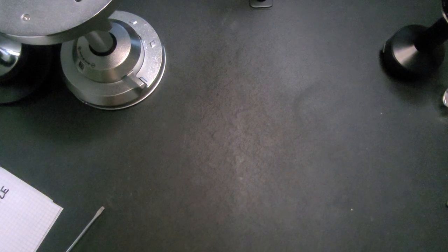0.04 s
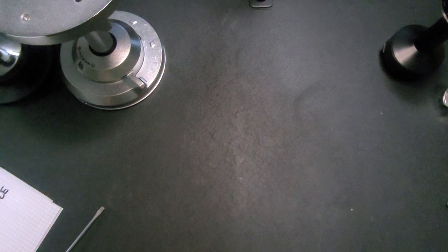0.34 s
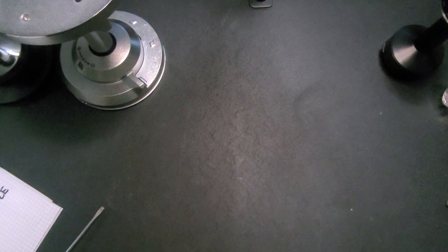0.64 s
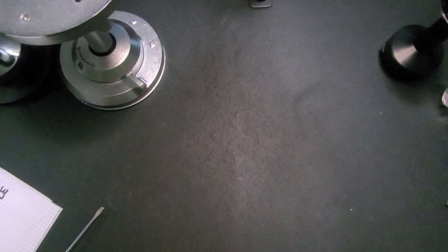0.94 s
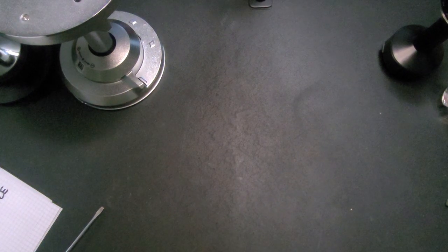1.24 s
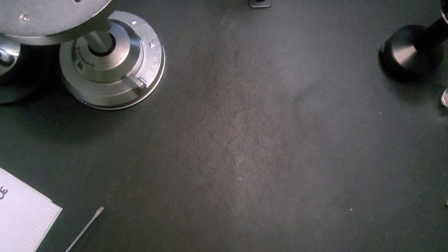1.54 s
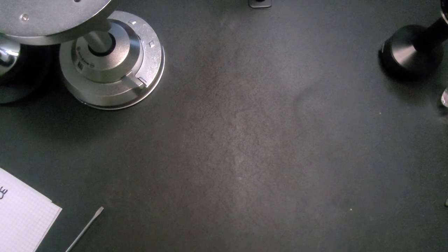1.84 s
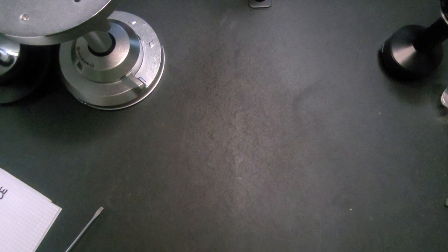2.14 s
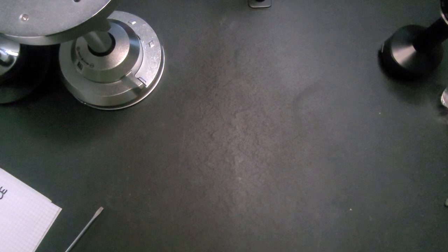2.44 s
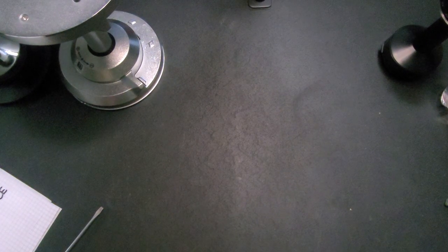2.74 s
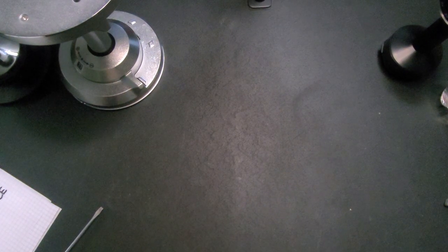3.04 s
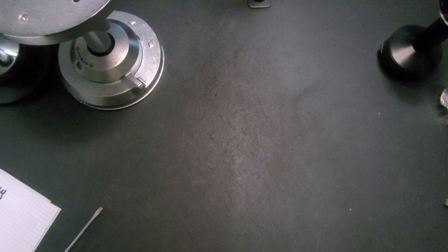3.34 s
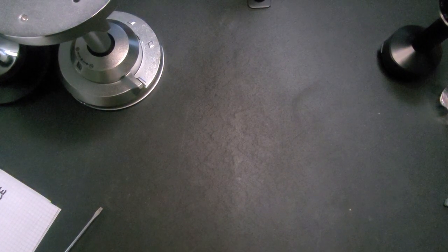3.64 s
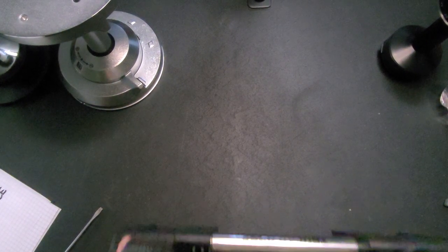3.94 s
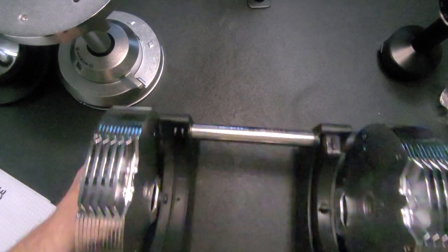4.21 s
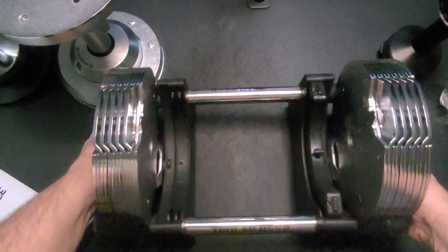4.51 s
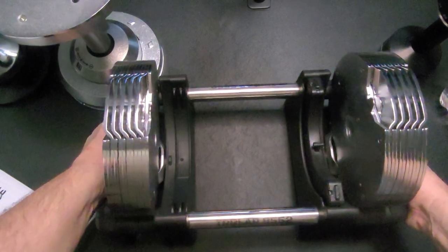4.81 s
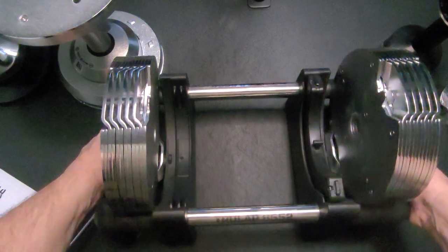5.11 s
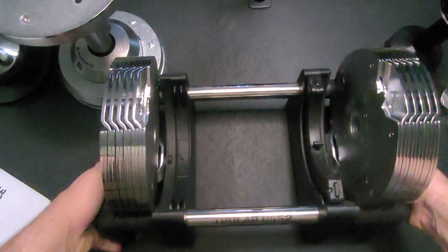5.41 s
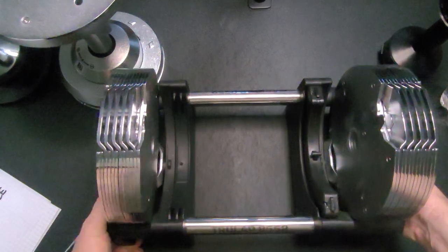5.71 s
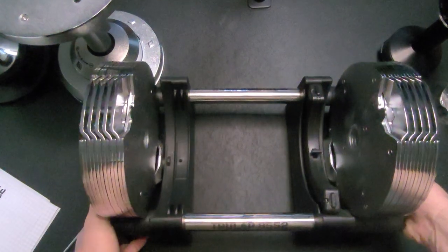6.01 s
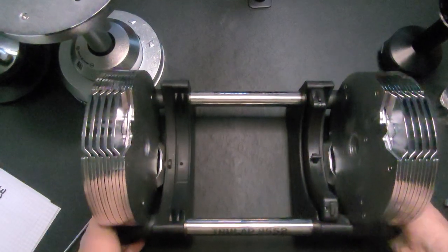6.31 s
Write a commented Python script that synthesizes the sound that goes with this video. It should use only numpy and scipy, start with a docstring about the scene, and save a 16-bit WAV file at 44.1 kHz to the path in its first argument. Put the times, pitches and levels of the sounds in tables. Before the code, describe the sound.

In a small room, a few scuffs and hollow knocks sound as an adjustable dumbbell is fetched. It lands on a bench with a low boom that shakes the microphones standing there. Its stacked steel plates clack and ring and its plastic base knocks, with the sharpest clack coming a second later. Lighter knocks and a thin, faint squeak follow as it is eased into place. Hands rub softly over faint steady noise.

```python
"""A small room with a bench. An adjustable dumbbell is fetched with a few scuffs, carried over and
lowered onto the bench in its base. The stacked steel plates clack and ring; the hollow plastic base
knocks and squeaks faintly. The bench booms under the weight and shakes the microphones standing on it.
Hands rub, and a soft hiss swells and sinks over steady noise."""
import sys
import numpy as np
from scipy import signal
from scipy.fft import rfft, irfft, next_fast_len
from scipy.io import wavfile
from scipy.ndimage import uniform_filter1d, map_coordinates

SR = 44100
rng = np.random.default_rng(int(sys.argv[2]) if len(sys.argv) > 2 else 0)


def unload_wav(signal):
    """Save mono or channel-first audio to the path in sys.argv[1] as 16-bit WAV at rate SR, clipped to [-1, 1]."""
    wavfile.write(
        sys.argv[1],
        SR,
        np.round(np.clip(np.atleast_2d(signal).T, -1, 1) * 32767).astype(np.int16),
    )


N = 289111
TOP_HZ = 16000


def amp(db):
    """dB to gain."""
    return 10 ** (np.asarray(db) / 20)


def unit(x):
    """x at rms 1."""
    return x / np.sqrt(np.mean(x ** 2) + 1e-20)


def along(points, hz):
    """Interpolate (f/Hz, value) points on a log axis."""
    f, v = np.transpose(points)
    return np.interp(np.log(hz + 1), np.log(f + 1), v)


def curves(rows):
    """Per-sample curve of each column after t/s."""
    times, *columns = np.transpose(rows)
    return [np.interp(np.arange(N) / SR, times, column) for column in columns]


def filtered(x, response):
    """Apply a complex frequency response."""
    n = x.shape[-1]
    m = next_fast_len(n + SR // 2)
    return irfft(rfft(x, m) * response(np.fft.rfftfreq(m, 1 / SR)), m)[..., :n]


def resonances(modes, hz):
    """Causal response of modes: f/Hz, width/Hz, gain/dB."""
    return sum(amp(db) * 1j * hz * w / (f * f - hz * hz + 1j * hz * w) for f, w, db in modes)


def noise_pair(size, corr):
    """Stereo white noise with L-R correlation corr."""
    mid, side = rng.standard_normal((2, size))
    angle = np.arccos(np.clip(corr, -1, 1)) / 2
    return np.cos(angle) * mid + np.sin(angle) * np.array([side, -side])


def coloured_noise(spectrum, corr):
    """Shaped stereo noise, rms 1."""
    return unit(filtered(noise_pair(N, corr), lambda hz: amp(along(spectrum, hz))))


def jitter(size, window):
    """Moving-average noise, rms 1."""
    return unit(uniform_filter1d(rng.standard_normal(size), size=window))


def panned(pan_db):
    """L and R gains, mean 1."""
    gains = amp(np.array([[pan_db], [-pan_db]]) / 2)
    return gains / gains.mean()


def add(track, start_s, sound):
    """Mix a sound in at start_s."""
    part = track[:, max(round(start_s * SR), 0):][:, :sound.shape[-1]]
    part += sound[:, :part.shape[1]]


def envelope(t, rise_s, t60_s):
    """Exponential rise and decay, peak 1."""
    shape = (1 - np.exp(-t / max(rise_s, 1e-4))) * amp(-60 * t / max(t60_s, 0.004))
    return shape / shape.max()


# Body, middle, treble bands: f_low/Hz, f_high/Hz
CONTACT_BANDS = [(280, 950), (1000, 3600), (3800, 14500)]
# L-R correlation per band
CONTACT_CORR = [0.75, 0.26, 0.05]


def contact(db, bright_db, t60_s, body_db, rise_s, grain_db):
    """Rough contact: a dying shower of tiny impacts, tilted about the middle band by bright_db."""
    t = np.arange(SR // 3) / SR
    smooth = envelope(t, rise_s, t60_s)
    shower = smooth * amp(grain_db * jitter(len(t), window=40))
    shower *= np.linalg.norm(smooth) / np.linalg.norm(shower)
    levels_db = [db + body_db - bright_db, db, db + bright_db]
    out = 0
    for band_db, edges_hz, corr in zip(levels_db, CONTACT_BANDS, CONTACT_CORR):
        band = signal.butter(3, edges_hz, "band", fs=SR, output="sos")
        out = out + amp(band_db) * unit(signal.sosfilt(band, noise_pair(len(t), corr) * shower))
    return out * np.sqrt(np.mean(smooth ** 2))


# Plate contacts: t/s, level/dB, brightness/dB, t60/s
PLATE_CLACKS = [(3.808, -39.5, 0, 0.1), (3.8174, -32, 0, 0.084), (3.8317, -27.5, -1.5, 0.048),
                (3.9732, -24.5, 0, 0.044), (3.9854, -24, 3.5, 0.041), (4.1235, -45.5, -2, 0.19),
                (4.1782, -45, -2.5, 0.023), (4.313, -51, 1.5, 0.049), (4.384, -46.5, -5, 0.083),
                (4.5868, -46.5, -4.5, 0.25), (4.6109, -37.5, -4.5, 0.058), (4.7136, -43, -10.5, 0.083),
                (4.7277, -37.5, -3, 0.033), (4.748, -32.5, -10.5, 0.014), (4.8514, -39.5, -6.5, 0.065),
                (4.9347, -31.5, -8.5, 0.019), (4.9631, -45.5, -0.5, 0.27), (4.997, -27, 1.5, 0.1),
                (5.0175, -14.5, 0, 0.048), (5.0293, -25.5, -1.5, .033), (5.0846, -37.5, 3.5, 0.047),
                (5.1061, -35.5, -4, 0.027), (5.5512, -54.5, 9.5, 0.029), (6.079, -39, -1.5, 0.05),
                (6.1, -33, 1.5, .055), (6.17, -38.5, -5.5, 0.054), (6.2504, -51, 0, 0.12),
                (6.2938, -55.5, 14, 0.012)]
# Steel modes: f/Hz, width/Hz, gain/dB
STEEL_MODES = [(781, 30, -6), (990, 25, -14), (1180, 4, -6), (1220, 14, -3), (2083, 16, -11),
               (2576, 40, -1), (2689, 30, -7), (3128, 55, -3), (3840, 20, -15), (4384, 20, -11),
               (5260, 70, -11), (7540, 40, -16), (8350, 30, -19), (9510, 30, -15), (11210, 30, -12),
               (11700, 30, -11), (12050, 35, -11), (12810, 40, -13), (13385, 40, -9)]
# Plate colour: f/Hz, gain/dB
PLATE_EQ = [(500, 0.5), (1600, -3.5), (3000, -5), (5500, 1), (8000, -2.5), (10500, -2.5), (13000, 4),
            (15000, -1)]
# Plate balance: f/Hz, L-R/dB
PLATE_PAN = [(500, 4.5), (2500, 4.5), (5000, 2.5), (11000, -5)]


def plates():
    """Loose steel plates clack together and ring on in their modes."""
    clacks, blows = np.zeros((2, N)), np.zeros((2, N))
    rise_s, blow_db, pan = 0.0015, 32.5, panned(-0.5)
    for start_s, db, bright_db, t60_s in PLATE_CLACKS:
        clack = contact(db, bright_db, t60_s, body_db=-5.5, rise_s=rise_s, grain_db=2.5)
        # gentler touch: longer contact, less treble
        corner_hz = np.clip(15000 * amp(0.24 * (db + bright_db + 18.5)), 4000, 18000)
        lowpass = signal.butter(2, corner_hz, fs=SR, output="sos")
        add(clacks, start_s, signal.sosfilt(lowpass, clack) * pan)
        # the hardest instant rings the whole plate
        blow = signal.sosfilt(lowpass, signal.unit_impulse(SR // 20))
        add(blows, start_s + rise_s, amp(db + bright_db / 2 + blow_db) * blow * pan)
    ring = filtered(amp(4) * clacks + blows, lambda hz: resonances(STEEL_MODES, hz))
    direct = clacks + ring
    colour = lambda hz: amp(along(PLATE_EQ, hz) + along(PLATE_PAN, hz) / 2 * np.array([[1], [-1]]))
    return filtered(direct + amp(-8.5) * room(direct), colour)


# Base knocks: t/s, level/dB, f/Hz, clatter level/dB, t60/s
BASE_KNOCKS = [(0.311, -41, 205, -57, 0.074), (0.327, -41, 265, -43.5, .12), (0.353, -30, 390, -33, 0.064),
               (0.361, -28.5, 211, -59, 0.061), (1.165, -41.5, 140, -62, 0.67),
               (1.258, -32, 322, -45, 0.13), (1.365, -31.5, 328, -52, 0.055), (1.385, -26, 343, -49, .18),
               (1.623, -42.5, 560, -58, 0.12), (2.075, -36.5, 576, -70, 0.14),
               (2.311, -34.5, 568, -41, 0.66), (2.391, -30, 530, -42, 0.17), (3.028, -35, 887, -40, 0.11),
               (3.369, -37, 230, -53, 0.038), (3.386, -24, 227, -38.5, 0.11), (3.781, -22, 262, -65, 0.15),
               (3.793, -20, 217, -58, 0.18), (3.993, -20.5, 365, -25.5, 0.089),
               (4.038, -40, 650, -50, 0.038), (4.093, -31, 546, -38, 0.071),
               (4.118, -30.5, 620, -37, 0.096), (4.156, -34, 615, -29, 0.061),
               (4.415, -36, 540, -41.5, 0.055), (4.676, -23.5, 279.8, -37, 0.39),
               (4.712, -24.5, 230, -31.5, .16), (4.75, -28, 229, -41.5, 0.12), (4.86, -33, 276, -31.5, .12),
               (4.938, -22, 254, -30, 0.18), (5.018, -19.5, 810, -23, 0.068),
               (5.048, -20.5, 214, -30.5, .19), (5.107, -30, 418, -35.5, 0.06),
               (5.254, -38.5, 285, -64, .1), (5.522, -32, 248, -58, .085), (6.071, -26, 232, -31, 0.39),
               (6.181, -31, 234, -50, 0.075), (6.221, -28, 236, -58, 0.069), (6.277, -41, 253, -45, 0.097),
               (6.458, -37, 233, -60, 0.2), (6.54, -35.5, 275, -42.5, 0.18)]
# Hollow shell modes: f/Hz, width/Hz, gain/dB
SHELL_MODES = [(245.4, 28, -6), (368, 36, 10.5), (391, 45, 12), (548, 7.2, 4), (668, 57, 5.5), (778, 43, 2),
               (888, 20, -3), (1296, 290, -4.5)]
# Shell clatter: f/Hz, level/dB
CLATTER_SPECTRUM = [(150, -2), (400, -2.5), (750, 7), (1000, -16), (1400, -13), (2200, -45.5)]
# Balance, low knocks reaching the left through the bench: f/Hz, L-R/dB
BASE_PAN = [(280, 21), (325, 2), (600, 5.5)]


def base():
    """Soft blows on the hollow plastic base: each spot rings at its own pitch, the shell clatters."""
    out, t = np.zeros((2, N)), np.arange(SR // 4) / SR
    shell = lambda hz: amp(along(CLATTER_SPECTRUM, hz)) * (1 + amp(3) * resonances(SHELL_MODES, hz))
    for start_s, db, pitch_hz, clatter_db, t60_s in BASE_KNOCKS:
        pan_db = along(BASE_PAN, pitch_hz)
        blow = envelope(t, 0.0037, t60_s)
        spot = lambda hz: resonances([(pitch_hz, 0.7 * pitch_hz, 0)], hz) ** 2
        thud = unit(filtered(noise_pair(len(t), corr=0.67) * blow, spot))
        ring = unit(np.sin(2 * np.pi * pitch_hz * t) * blow)
        burst = noise_pair(len(t), corr=0.7) * envelope(t, 0.002, 0.98 * t60_s)
        clatter = unit(filtered(burst, shell))
        add(out, start_s, amp(db - 22.5) * (thud + amp(1) * ring) * panned(pan_db))
        add(out, start_s, amp(clatter_db - 14.5) * clatter * panned(0.28 * pan_db))
    return out + amp(-16) * room(out)


# Loads on the bench: t/s, boom level/dB, sway level/dB, drum level/dB
BENCH_THUMPS = [(0.023, -49, -58, -59.5), (0.367, -30.5, -33.5, -37), (1.153, -51.5, -49, -58),
                (3.387, -34, -45, -37), (3.792, -31, -19, -23), (3.99, -46.5, -51, -57),
                (4.672, -36.5, -37, -38.5), (4.707, -28, -28, -58), (4.946, -29.5, -46, -50),
                (5.035, -38, -37, -20.5), (5.306, -33, -52, -37), (5.667, -52, -64, -47.5),
                (6.099, -45, -42, -36), (6.226, -49.5, -58, -29)]
# Sway, boom, flex, drum modes: f/Hz, t60/s
BENCH_MODES = [(50, 0.51), (72, 0.45), (122, 0.36), (191, 0.19)]


def bench():
    """The weight rings four bench modes; a stand carries them mostly to the left microphone."""
    out, t = np.zeros((2, N)), np.arange(SR) / SR
    for start_s, boom_db, sway_db, drum_db in BENCH_THUMPS:
        levels_db = [sway_db - 5, boom_db + 5.5, boom_db - 13, drum_db]
        ring = 0
        for (hz, t60_s), db in zip(BENCH_MODES, levels_db):
            detuned_hz = hz * rng.normal(1, 0.022)
            swell = envelope(t, 0.95 / hz, t60_s)  # load builds over a cycle or two
            ring = ring + amp(db) * np.sin(2 * np.pi * detuned_hz * t) * swell
        add(out, start_s, ring * panned(20))
    return amp(1.5) * out


# Steps and handling: t/s, level/dB, brightness/dB, t60/s
FAR_SCUFFS = [(1.134, -57.5, -7, 1), (1.233, -43, -0.5, 0.12), (1.261, -57, 1, 0.039),
              (1.366, -46, -7, 0.22), (1.389, -55, 1, 0.041), (1.621, -56.5, -5, 0.15),
              (1.999, -58.5, -8.5, 0.52), (2.067, -58.5, -7, 0.68), (2.197, -49, 2, 0.16),
              (2.305, -39.5, 2.5, .09), (2.392, -41.5, -2, .18), (2.416, -37.5, 0, 0.1),
              (2.611, -57.5, -5, .36), (2.649, -44, -2, 0.096), (3.017, -51.5, -6.5, 0.19),
              (3.211, -50, -6.5, 0.056), (3.309, -42.5, -6.5, .13), (3.456, -45.5, -4.5, 0.11)]


def scuffs():
    """Scuffs and rattles across the room, coloured by resonances and reverberation."""
    contacts = np.zeros((2, N))
    for start_s, db, bright_db, t60_s in FAR_SCUFFS:
        add(contacts, start_s, contact(db, bright_db, t60_s, body_db=-3.5, rise_s=0.0045, grain_db=2))
    peaks = [(1330, 76, -10), (4990, 840, 0.5)]
    colour = lambda hz: amp(-1) + amp(-18) * resonances(SHELL_MODES, hz) + resonances(peaks, hz)
    direct = filtered(contacts, colour)
    return (amp(-2) * direct + amp(-5.5) * room(direct)) * panned(4)


# Squeak contour: t/s, f/Hz, level/dB
SQUEAK_PATH = [(5.62, 7300, -68), (5.74, 6130, -101.5), (5.83, 7740, -75.5), (5.9, 7200, -72.5),
               (5.93, 8870, -60.5), (6.0, 9240, -58), (6.07, 10620, -57), (6.1, 11600, -44),
               (6.16, 10800, -59), (6.2, 8020, -81), (6.27, 12000, -54), (6.3, 13600, -43),
               (6.34, 11400, -69.5)]


def squeak():
    """The base, eased into place, gives a thin broken whistle with a weaker partial a fifth up."""
    pitch_hz, db = curves(SQUEAK_PATH)
    t = np.arange(N) / SR
    waver = 0.006 * jitter(N, window=120)
    grip_db = 3 * jitter(N, window=900)
    phase = 2 * np.pi * np.cumsum(pitch_hz * (1 + waver)) / SR
    upper = (1.5 * pitch_hz < TOP_HZ) * np.sin(1.5 * phase)
    gate = (t > SQUEAK_PATH[0][0]) * (t < SQUEAK_PATH[-1][0])
    return amp(db + grip_db - 8) * gate * (np.sin(phase) + 0.5 * upper)


# Handling contour: t/s, tremor level/dB, rub level/dB
HANDLING_LEVELS = [(0.0, -59, -68.5), (1.51, -69, -63.5), (3.27, -73.5, -61.5), (3.49, -42, -59),
                   (3.82, -84, -63.5), (3.94, -53, -55), (4.33, -64, -60), (4.67, -73.5, -59),
                   (4.87, -34.5, -48), (5.35, -40.5, -54), (5.59, -50.5, -63), (5.99, -54, -55),
                   (6.26, -46.5, -51.5), (6.56, -43.5, -59.5)]
# Bench tremor: f/Hz, level/dB
TREMOR_SPECTRUM = [(15, -12), (42, 2), (72, 5.5), (105, -10.5), (250, -72.5)]
# Hand rub: f/Hz, level/dB
RUB_SPECTRUM = [(90, -13.5), (155, -5), (230, 1.5), (400, -3.5), (750, -15.5), (1200, -23), (3000, -45.5)]


def handling():
    """The bench trembles and hands rub: two low noises that swell and sink."""
    tremor_db, rub_db = curves(HANDLING_LEVELS)
    tremor = amp(tremor_db) * coloured_noise(TREMOR_SPECTRUM, corr=0.95) * panned(15)
    rub = amp(rub_db) * coloured_noise(RUB_SPECTRUM, corr=0.9) * panned(6)
    return tremor + rub


# Swishes: t/s, length/s, level/dB
SOFT_SWISHES = [(0, .1, -69), (.3, 0.34, -69), (0.64, 0.062, -59.5), (0.953, .06, -57),
                (1.064, 0.34, -68.5), (1.74, 0.12, -61.5), (2.273, 0.14, -66.5), (2.81, 0.19, -62),
                (3.126, 0.058, -61), (3.25, .19, -58), (3.51, 0.22, -66), (3.848, 0.22, -60.5),
                (4.17, 0.19, -73), (5.03, 0.55, -57.5), (6.018, .12, -57), (6.247, .11, -60),
                (6.5, .07, -57.5)]
# Fine hiss: f/Hz, level/dB
HISS_SPECTRUM = [(1500, -23.5), (3500, -5), (6000, -8.5), (9000, -5.5), (12500, 4), (15500, 2)]


def swishes():
    """A fluttering hiss swells, holds and dies back to its floor, as of sleeves and palms brushing."""
    rise_s, t60_s, floor_db = 0.058, 0.37, -74.5
    flutter_db, flutter_per_s = 2.3, 18
    t = np.arange(N) / SR
    power = amp(floor_db) ** 2
    for start_s, length_s, db in SOFT_SWISHES:
        attack = np.clip((t - start_s) / rise_s, 0, 1)
        release = amp(-60 * np.maximum(t - start_s - length_s, 0) / t60_s)
        power = power + (amp(db) * attack * release) ** 2
    flutter = map_coordinates(rng.standard_normal(SR // 20), [t * flutter_per_s])
    gain = np.sqrt(power) * amp(7 + flutter_db * flutter)
    return gain * coloured_noise(HISS_SPECTRUM, corr=0.033) * panned(0.5)


# Room decay: f/Hz, t60/s
ROOM_DECAY = [(150, 0.57), (600, 0.31), (3000, 0.35), (8000, 0.27), (15000, 0.21)]


def room(x):
    """Diffuse reverberation of the small room; treble dies first."""
    hz, t, spectra = signal.stft(rng.standard_normal((2, SR // 2)), SR, nperseg=256)
    decay = amp(-60 * t / along(ROOM_DECAY, hz)[:, None])
    tail = signal.istft(spectra * decay, SR, nperseg=256)[1]
    tail *= 1 - np.exp(-np.arange(tail.shape[1]) / SR / 0.0026)  # build-up
    return signal.fftconvolve(x.mean(0)[None], tail / np.linalg.norm(tail[0]), axes=1)[:, :N]


# Steady noise: f/Hz, level/dB
FLOOR_SPECTRUM = [(60, -3.5), (200, -10.5), (400, 1), (800, 1), (1100, -4), (1550, 2.5), (2000, 3),
                  (2700, 8), (3100, 1.5), (3450, -13), (8000, -37), (16000, -72)]
# Its balance: f/Hz, L-R/dB
FLOOR_PAN = [(300, -6.5), (800, 13.5), (2500, 29), (4000, 57), (7000, -14)]


def noise_floor():
    """Faint steady noise, mostly on the left."""
    noise = coloured_noise(FLOOR_SPECTRUM, corr=0.16)
    balance = lambda hz: amp(along(FLOOR_PAN, hz) * np.array([[0], [-1]]))
    return amp(-56.5) * filtered(noise, balance)


def scene():
    """Stereo sum of all sources."""
    return scuffs() + plates() + base() + bench() + squeak() + handling() + swishes() + noise_floor()


def record(dry):
    """Brick-wall low-pass at TOP_HZ."""
    return filtered(dry, lambda hz: hz < TOP_HZ)


dry = scene()
out = record(dry)
unload_wav(out)
```